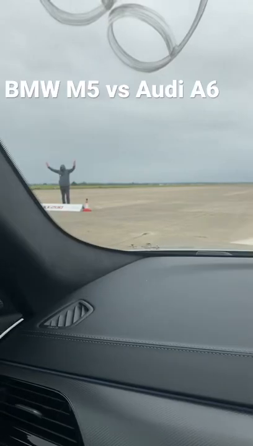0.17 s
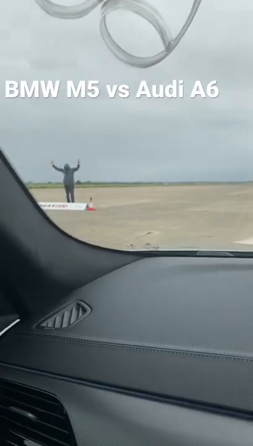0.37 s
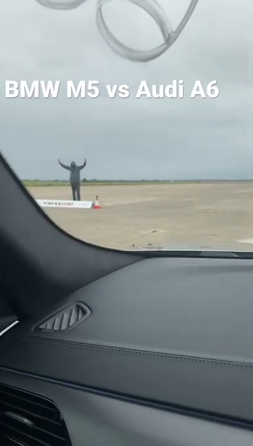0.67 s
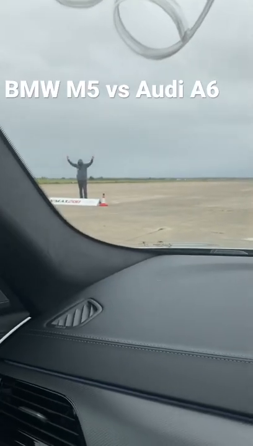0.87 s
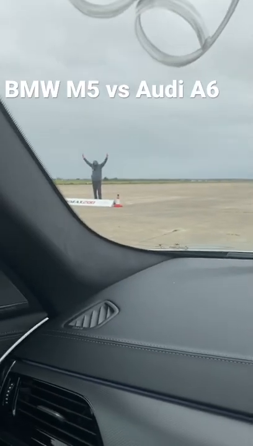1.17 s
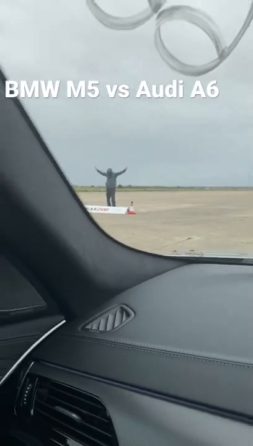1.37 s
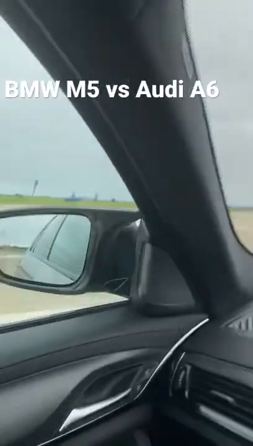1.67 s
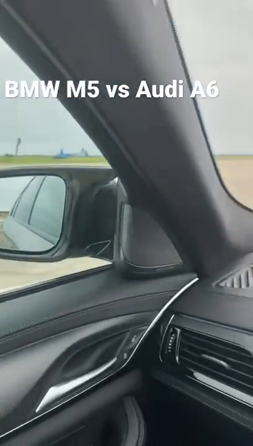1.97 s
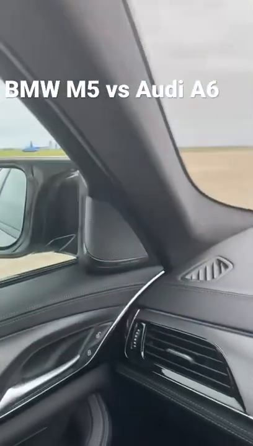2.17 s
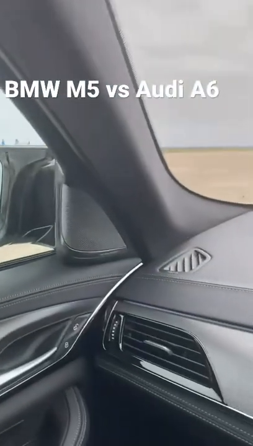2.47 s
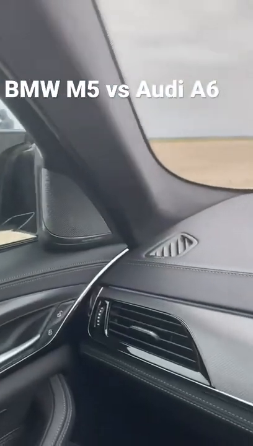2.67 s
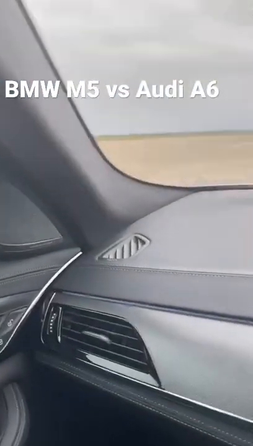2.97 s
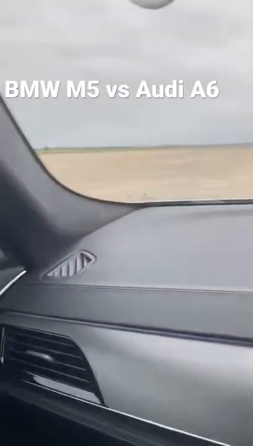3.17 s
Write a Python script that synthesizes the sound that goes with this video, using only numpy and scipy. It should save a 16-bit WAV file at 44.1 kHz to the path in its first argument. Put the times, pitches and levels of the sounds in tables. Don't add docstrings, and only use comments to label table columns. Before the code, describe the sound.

Inside a closed car, the engine holds steady and muffled with small plastic clicks, then handling knocks, a launch thump and a hard acceleration, growing louder and higher to the end, in close stereo.

```python
import sys
import numpy as np
from scipy import signal
from scipy.fft import rfft, irfft
from scipy.io import wavfile
from scipy.ndimage import uniform_filter1d

SR = 44100
rng = np.random.default_rng(int(sys.argv[2]) if len(sys.argv) > 2 else 0)


def master(y):
    cut = np.clip(np.atleast_2d(y).T, -1, 1)
    pcm = np.round(cut * 32767)
    wavfile.write(sys.argv[1], SR, pcm.astype(np.int16))


def amplitude_ratio(level_db):
    exponent = np.asarray(level_db, float) / 20
    return 10 ** exponent


N = 145971

# [t/s, four-stroke cycle rate f/Hz]
ENGINE_SPEED = [(0, 14), (.1, 13.9), (.28, 13.45), (.45, 13.8), (.6, 14.1), (1.24, 14), (1.3, 14.4),
                (1.44, 15.7), (1.65, 18.7), (1.74, 19.2), (1.9, 19.4), (2.02, 21.4), (2.2, 24.4),
                (2.43, 29.8), (2.65, 35.9), (2.91, 42.6), (3.2, 50.6), (3.31, 53.4)]
# [t/s, load 0-1, sixth-order exhaust drone level/dB, eighth-order firing beat level/dB,
# twelfth-order drone overtone level/dB]
ENGINE_EFFORT = [(0, .15, -8.5, 5.5, -5), (0.197, 0.2, 4.5, 6.5, -1), (0.398, .05, -1, 11, 4),
                 (0.598, 0.12, 1.5, -1.5, -1), (1.25, 0.34, -2.5, 1.5, -6), (1.459, .3, 5.5, 5, 6.5),
                 (1.58, 0.3, 5.5, 5.5, 4.5), (1.701, 0.63, 5, 3.5, 3.5), (1.83, 0.65, 4.5, -8, -6.5),
                 (1.953, 0.62, -1.5, 8.5, -13), (2.079, 0.67, 4.5, 3.5, 6), (2.2, 0.73, 7, 5.5, 0.5),
                 (2.281, 0.78, 3, -2, -12.5), (2.402, 0.77, 5.5, 4.5, 0), (2.552, 0.93, -1.5, 1, -2.5),
                 (2.799, 0.92, 3, -5, 1), (3.052, 1, -2.5, 0, -1.5), (3.31, 1.04, 2.5, 2.5, 4)]
# [multiple of the cycle rate, level/dB on the brake, level/dB at full load]
ENGINE_ORDERS = [(1, -73.5, -44), (2, -76.5, -24), (3, -70, -21.5), (4, -51, -30.5), (5, -45, -29.5),
                 (6, -36, -23), (7, -61, -22.5), (8, -37, -27.5), (9, -58.5, -42.5), (10, -59, -26),
                 (11, -50.5, -36), (12, -48.5, -30), (13, -52, -50.5), (14, -60.5, -34.5), (15, -49, -32.5),
                 (16, -59, -39), (17, -72, -47.5), (18, -62, -41.5), (19, -67.5, -59), (20, -65, -39),
                 (23, -54.5, -47), (26, -60, -54.5)]
# [f/Hz, width/Hz, level/dB over the flat path, polarity +-1]
CABIN_MODES = [(47, 38.6, 16, 1), (100.2, 19.6, 11, 1), (140, 20, 0, 1), (263.7, 39, 4, 1),
               (316, 57, 5.5, 1), (445.5, 70.4, 14, -1), (453.8, 81, 16, 1), (562.5, 40, 5.5, -1),
               (687, 46, 1.5, 1), (780, 160, -1, -1), (940, 260, 7.5, 1), (1200, 150, -1, -1)]
# [f/Hz, width/Hz, depth 0-1]
LEFT_DIPS = [(338, 28, 0.6), (434, 31, 1), (710, 65, 1)]
# [f/Hz, width/Hz, depth 0-1]
RIGHT_DIPS = [(810, 72, .75), (1030, 27, 1)]
# [f/Hz, phase/rad]
STANDING_LEAD = [(45, -.2), (80, .6), (110, 1.05), (150, 1.7), (220, 2.3), (280, -.3), (500, -.2)]
# [f/Hz, level/dB per Hz]
HUM_SHAPE = [(30, -20), (100, -7), (145, -29), (235, -38.5), (300, -19.5), (430, -33), (900, -37),
             (2800, -67.5)]
# [f/Hz, level/dB per Hz]
ROAD_SHAPE = [(22, -24.5), (50, -3), (90, -11), (200, -13.5), (650, -30.5), (1100, -42.5), (2200, -68),
              (4500, -84)]
# [t/s, level/dB]
ROAD_SWELL = [(1.202, -20.5), (1.498, -6.5), (1.749, -3), (2.099, -3.5), (2.5, 3), (2.9, 5.5), (3.3, 3)]
# [f/Hz, level/dB per Hz]
ROAR_SHAPE = [(400, -14.5), (900, -3), (1500, 4), (2400, -2.5), (3500, -23), (6000, -37)]
# [t/s, level/dB]
RUB_FORCE = [(0.297, -89.5), (.37, -76.5), (0.471, -91.5), (1.249, -92.5), (1.38, -66), (1.532, -60.5),
             (1.638, -70), (1.688, -63), (1.72, -50), (1.748, -53), (1.789, -70.5), (1.871, -76.5),
             (2.162, -82.5), (2.203, -74), (2.508, -67.5), (2.648, -80), (2.844, -68.5), (3.302, -69.5)]
# [f/Hz, level/dB per Hz]
CLOTH_SHAPE = [(500, -6), (1200, 0), (2400, -7), (3900, -11), (5600, -13), (7800, -13), (10500, -17),
               (12500, -30)]
# [t/s, peak level/dB, ring f/Hz, ring t60/s]
CLICK_EVENTS = [(0.122, -45.5, 3700, 0.018), (0.1285, -37.5, 3590, 0.034), (0.1321, -35.5, 2975, 0.051),
                (0.2724, -65, 1980, 0.04), (.513, -49, 3310, 0.022), (0.5226, -45, 1723, 0.05),
                (0.9685, -46.5, 3840, 0.046), (0.9762, -31, 3750, 0.036), (0.9779, -45, 1970, .05),
                (1.001, -50.5, 3310, 0.034), (1.0396, -59.5, 1700, 0.04), (2.0622, -53.5, 1680, 0.04),
                (2.595, -44, 2000, 0.04), (2.602, -44.5, 2540, 0.029)]
# [f/Hz, level/dB per Hz]
SNAP_SHAPE = [(800, -22), (2000, -8), (3300, 0), (4300, -3), (5500, -12), (8000, -15), (10500, -24),
              (12500, -40)]
# [t/s, peak level/dB, ring f/Hz, decay/s, scrape level/dB over the ring]
TAP_EVENTS = [(1.27, -29.5, 302.2, 0.06, -30.5), (1.369, -45, 1660, 0.0067, 2.5),
              (1.4525, -50.5, 2870, 0.0056, -1.5), (1.462, -28, 1546, 0.0084, 0),
              (1.466, -29.5, 743, 0.0099, -21.5), (1.527, -37.5, 2300, .004, 6),
              (1.533, -43.5, 1500, 0.0049, 8.5), (1.406, -42, 1200, .006, -0.5),
              (1.485, -39.5, 1420, .006, 1.5), (1.655, -42.5, 1470, 0.0059, -1.5),
              (1.585, -28, 685, 0.012, -10), (1.68, -49.5, 3050, 0.0057, 7), (1.698, -29.5, 1307, .007, -3),
              (1.716, -33.5, 1860, 0.01, 5.5), (1.726, -35.5, 2186, 0.0066, 5.5),
              (1.737, -27.5, 1233, 0.0068, 4), (1.752, -36, 1510, 0.003, 1.5),
              (1.763, -29.5, 1007, 0.0065, -0.5), (1.832, -25, 448.5, 0.021, -33.5),
              (1.84, -25.5, 722, 0.009, -24.5)]
# [t/s, peak level/dB, f/Hz, t60/s]
THUMP_EVENTS = [
    (1.70, -8.5, 46.9, 0.42),
    (1.818, -23, 171, 0.17),
    (1.922, -26, 47, 0.35),
    (2.137, -25, 58.3, 0.42),
    (2.373, -13.5, 138.7, 0.34),
    (2.39, -10, 51, 0.46),
    (2.762, -15.5, 52.8, 0.39),
]
# [f/Hz, left minus right level/dB]
PORT_BALANCE = [(40, -0.8), (110, -1), (230, 0.5), (330, -.5), (500, -7), (800, 0.5), (1300, -.2),
                (4000, -0.7)]
# [f/Hz, phase/rad]
PORT_LEAD = [(0, 0), (250, 0), (400, -.5), (650, .1), (1300, .65), (2300, .85), (3600, 2), (4500, 2.9),
             (6100, 3.4), (7300, 5.7), (9300, 6.7), (12000, 9.6)]
# [f/Hz, level/dB]
PORT_SPREAD = [(40, -22.5), (100, -17), (250, -19.5), (600, -6), (1500, -6), (3500, -7), (5200, -23.5),
               (10000, -23)]

STANDING_DB = -1.8


def on_log(table, hz):
    points = np.array(table, float)
    return np.interp(np.log(np.maximum(hz, 1)), np.log(points[:, 0]), points[:, 1])


def colour(x, table):
    return irfft(rfft(x) * amplitude_ratio(on_log(table, np.fft.rfftfreq(N, 1 / SR))), N)


def unit(x):
    return x / np.sqrt(np.mean(x ** 2))


def walk(rate_hz):
    hold = int(SR / rate_hz)
    steps = np.repeat(rng.standard_normal(N // hold + 1), hold)
    return unit(uniform_filter1d(uniform_filter1d(steps, hold), hold)[:N])


def bands(table, swell_db, flicker_db):
    hz, swell = np.fft.rfftfreq(N, 1 / SR), walk(1)
    spectrum = rfft(rng.standard_normal(N)) * amplitude_ratio(on_log(table, hz))
    out = np.zeros(N)
    for centre in np.arange(4.5, 13, 1.):
        part = np.clip(1 - abs(np.log2(hz + 1) - centre), 0, 1)
        out += irfft(spectrum * part, N) * amplitude_ratio(swell_db * swell + flicker_db * walk(10))
    return unit(out)


def cabin(hz):
    return 1 + sum(np.sign(sign) * amplitude_ratio(db) / (1 + 2j * (hz - f) / width)
                   for f, width, db, sign in CABIN_MODES)


def dips(table, hz):
    return np.prod([1 - min(depth, .97) / (1 + 2j * (hz - f) / width) for f, width, depth in table], axis=0)


def engine(t):
    step = 32
    wobble_db, wobble_hz = 2, 8
    drift_rad, drift_hz = .25, 6.5
    off_load_dark_db, standing_ends_load = 7, .9
    cycle_hz = uniform_filter1d(np.interp(t, *np.array(ENGINE_SPEED).T), size=2500)
    phase = 2 * np.pi * np.cumsum(cycle_hz) / SR
    effort = np.array(ENGINE_EFFORT)
    load, drone, beat, over = (np.interp(t[::step], effort[:, 0], c) for c in effort.T[1:])
    idle = np.clip(1.15 - load / standing_ends_load, 0, 1) ** 1.5
    off_load = np.clip(1 - load, 0, 1)
    out = np.zeros((2, N))
    for order, rest_db, full_db in ENGINE_ORDERS:
        order = int(round(order))
        lift = drone * (order == 6) + beat * (order == 8) + over * (order == 12)
        if order > 8 and order != 12:
            lift = lift - off_load_dark_db * off_load
        f = order * cycle_hz[::step]
        level = rest_db + (full_db - rest_db) * load + lift + wobble_db * walk(wobble_hz)[::step]
        drift = rng.uniform(0, 2 * np.pi) + drift_rad * walk(drift_hz)[::step]
        heard = cabin(f) * amplitude_ratio(level) * np.exp(1j * drift)
        c, s = np.cos(order * phase), np.sin(order * phase)
        skew = amplitude_ratio(STANDING_DB / 2 * idle) * np.exp(.5j * idle * on_log(STANDING_LEAD, f))
        for port, table, lean in zip(out, (LEFT_DIPS, RIGHT_DIPS), (skew, 1 / skew)):
            gain = heard * lean * dips(table, f)
            port += np.interp(t, t[::step], gain.real) * c
            port -= np.interp(t, t[::step], gain.imag) * s
    return out


def hum():
    return amplitude_ratio(-33.5) * bands(HUM_SHAPE, swell_db=0.23, flicker_db=1.8)


def whine():
    centre_hz, half_width_hz = 10950, 180
    edges = [centre_hz - half_width_hz, centre_hz + half_width_hz]
    band = signal.butter(2, edges, "band", fs=SR, output="sos")
    return amplitude_ratio(-83.5) * unit(signal.sosfilt(band, rng.standard_normal(N)))


def roar(t):
    cycle_hz = np.interp(t, *np.array(ENGINE_SPEED).T)
    pulse = 1 + 0.13 * np.sin(4 * np.pi * np.cumsum(cycle_hz) / SR)
    level = -49 + 10 * np.log2(cycle_hz / 50) + walk(23)
    return unit(colour(rng.standard_normal(N) * pulse, ROAR_SHAPE)) * amplitude_ratio(level)


def road(t):
    level = -23 + np.interp(t, *np.array(ROAD_SWELL).T)
    return amplitude_ratio(level) * bands(ROAD_SHAPE, swell_db=0.3, flicker_db=4.5)


def add_clicks(snap, ring, rough):
    rise_s, crack_s, crack_db, ring_db = .001, .004, -5, 2
    u = np.arange(5000) / SR
    for s, db, hz, t60 in CLICK_EVENTS:
        at = slice(int(s * SR), int(s * SR) + len(u))
        rise = amplitude_ratio(db) * (1 - np.exp(-u / rise_s))
        snap[at] += rise * amplitude_ratio(crack_db) * (np.exp(-u / crack_s) + 0.08 * np.exp(-u / .02))
        fade = np.exp(-np.log(1000) * u / t60)
        ring[at] += rise * amplitude_ratio(ring_db) * fade * np.sin(2 * np.pi * hz * u + 0.53 * rough[at])


def add_taps(scuff, ring, rough):
    rise_s, scuff_db, ring_db = .0012, -3.5, -4
    u = np.arange(9000) / SR
    for s, db, hz, decay_s, scrape_db in TAP_EVENTS:
        at = slice(int(s * SR), int(s * SR) + len(u))
        fall = amplitude_ratio(db) * (1 - np.exp(-u / rise_s)) * np.exp(-u / decay_s)
        scuff[at] += fall * amplitude_ratio(scuff_db + scrape_db)
        tone = np.sin(2 * np.pi * hz * u + min(hz / 800, 1.8) * rough[at])
        ring[at] += fall * amplitude_ratio(ring_db) * tone * (1 + 0.2 * rough[at])


def add_thumps(ring):
    u = np.arange(20000) / SR
    for s, db, hz, t60 in THUMP_EVENTS:
        at = slice(int(s * SR), int(s * SR) + len(u))
        swing = (1 - np.exp(-u / 0.037)) * np.exp(-np.log(1000) * u / t60)
        ring[at] += amplitude_ratio(db) * swing * 2 * np.sin(2 * np.pi * hz * u)


def knocks():
    snap, scuff, ring = np.zeros((3, N))
    rough = walk(209.8)
    add_clicks(snap, ring, rough)
    add_taps(scuff, ring, rough)
    add_thumps(ring)
    crack = snap * unit(colour(rng.standard_normal(N), SNAP_SHAPE))
    scrape = scuff * unit(colour(rng.standard_normal(N), CLOTH_SHAPE))
    return crack + scrape + ring


def cloth(t):
    force_db = np.interp(t, *np.array(RUB_FORCE).T)
    grain = amplitude_ratio(2 * walk(150) + 0.48 * walk(36))
    grains = unit(colour(rng.standard_normal(N) * grain, CLOTH_SHAPE))
    low = signal.sosfilt(signal.butter(2, 2500, fs=SR, output="sos"), grains)
    low_gain = amplitude_ratio(0.93 * np.minimum(force_db + 54.5, 0))
    return (grains - low * (1 - low_gain)) * amplitude_ratio(15 + force_db)


def scene():
    t, hz = np.arange(N) / SR, np.fft.rfftfreq(N, 1 / SR)
    left, right = rfft(engine(t))
    hits, still = rfft(knocks()), rfft(hum())
    skew = amplitude_ratio(STANDING_DB / 2) * np.exp(.5j * on_log(STANDING_LEAD, hz))
    mid = rfft(roar(t) + road(t) + cloth(t)) + hits
    side = rfft(roar(t) + hum() + road(t) + cloth(t)) * amplitude_ratio(on_log(PORT_SPREAD, hz))
    lead = np.interp(hz, *np.array(PORT_LEAD).T)
    tilt = amplitude_ratio(on_log(PORT_BALANCE, hz) / 2) * np.exp(.5j * lead)
    touch = amplitude_ratio(-11) * hits * (hz > 4000)
    left = (left + still * skew + mid + side + touch) * tilt
    right = (right + still / skew + mid - side - touch) / tilt
    return np.array([irfft(left, N), irfft(right, N)]) + whine()


def top_cut(x):
    return signal.sosfilt(signal.butter(12, 11130, fs=SR, output="sos"), x)


def record(dry):
    start_s, open_s = .0345, .00025
    opened = dry * np.clip((np.arange(N) / SR - start_s) / open_s, 0, 1)
    mix = np.tanh(0.77 * opened) / 0.9
    return top_cut(mix)


dry = scene()
out = record(dry)
master(out)
```